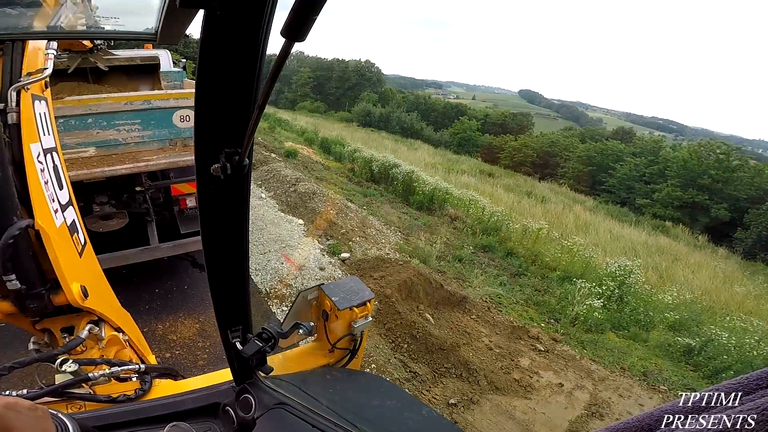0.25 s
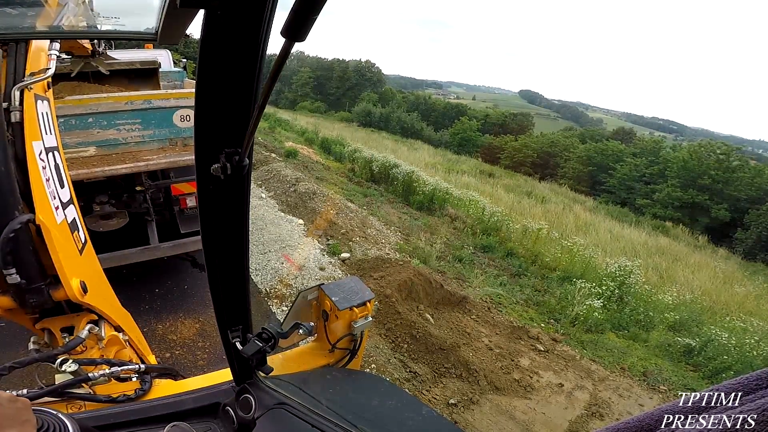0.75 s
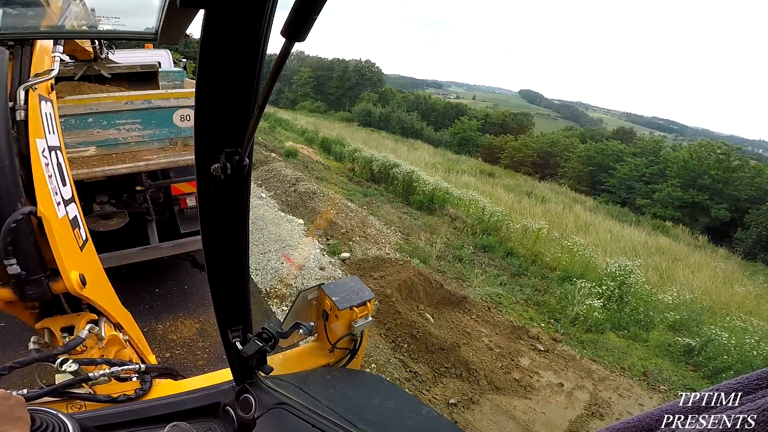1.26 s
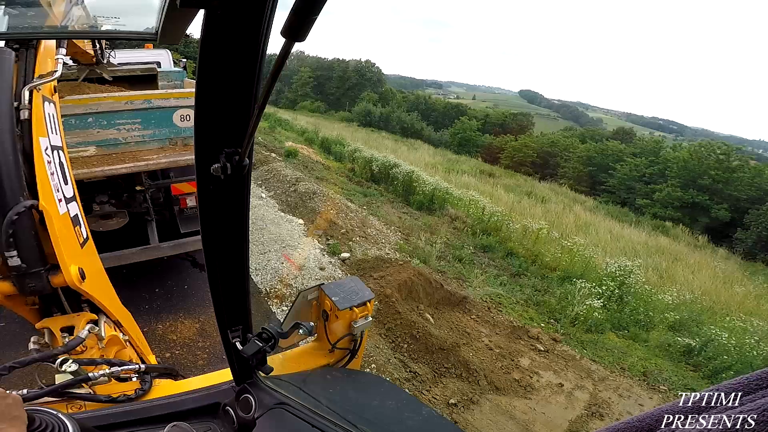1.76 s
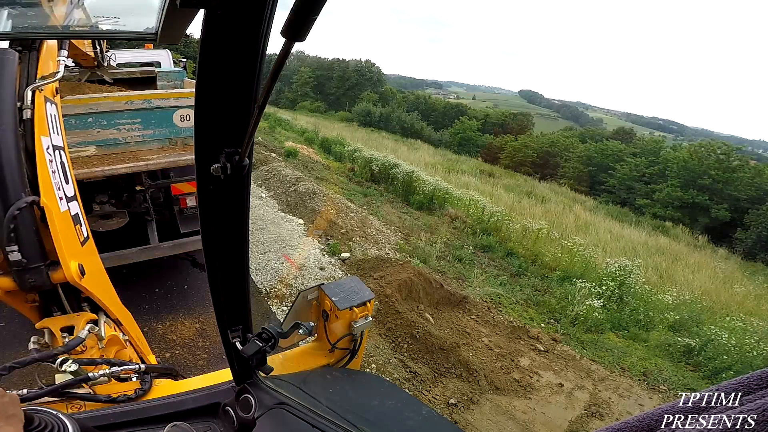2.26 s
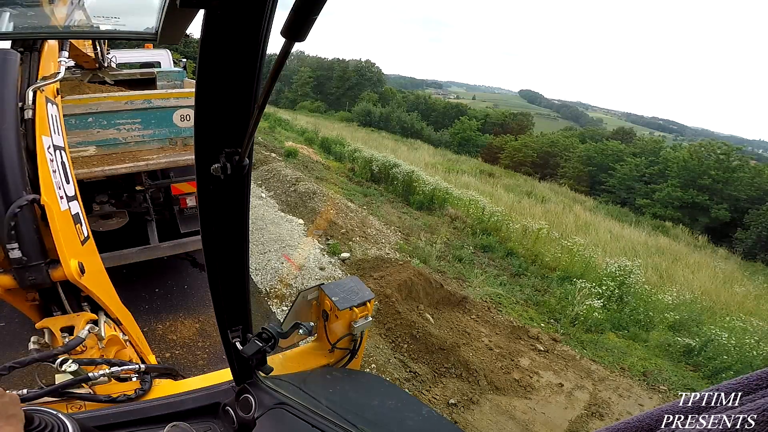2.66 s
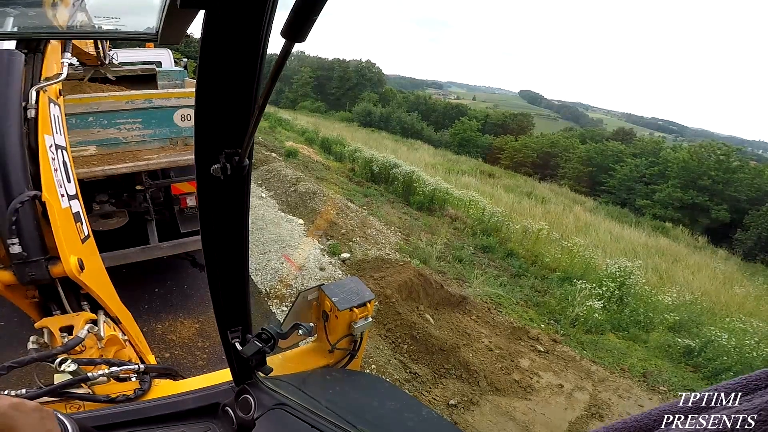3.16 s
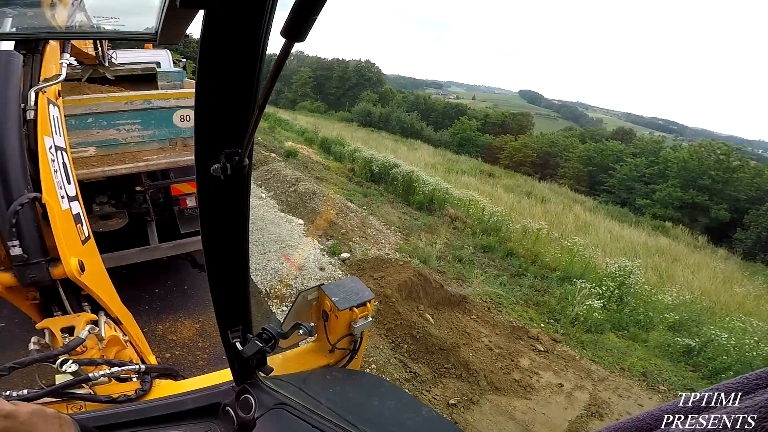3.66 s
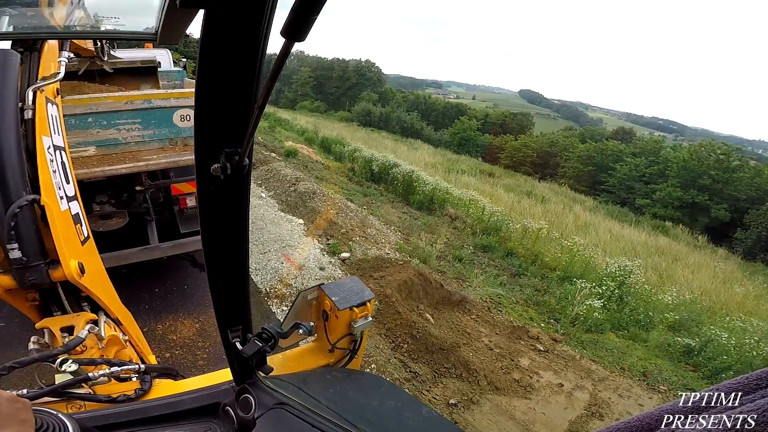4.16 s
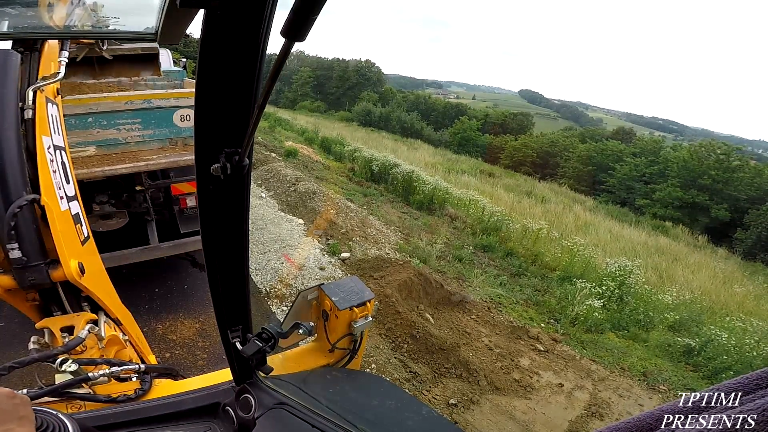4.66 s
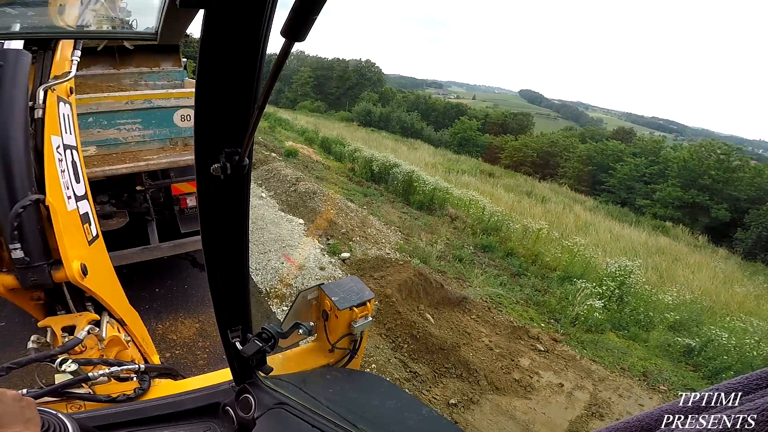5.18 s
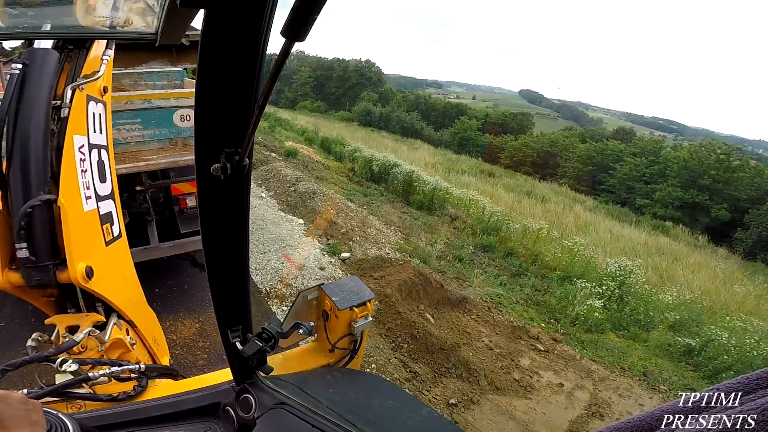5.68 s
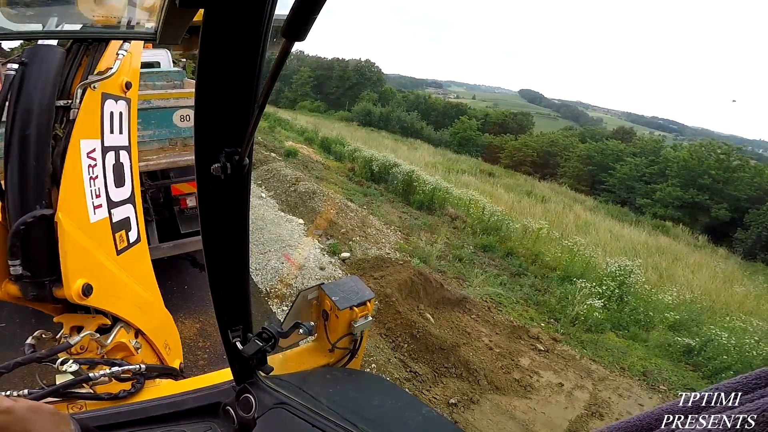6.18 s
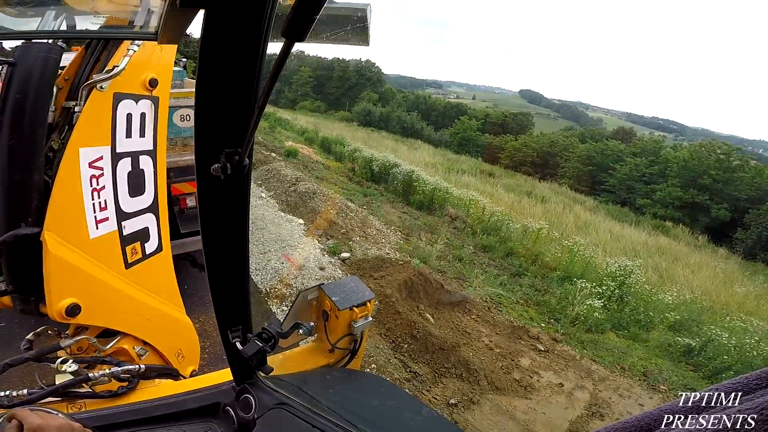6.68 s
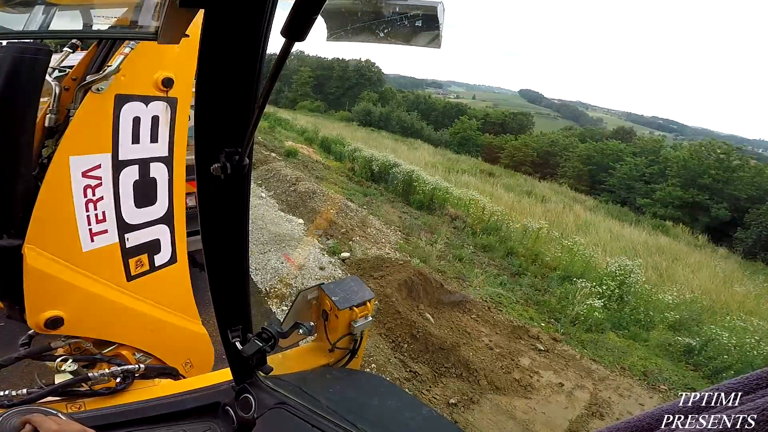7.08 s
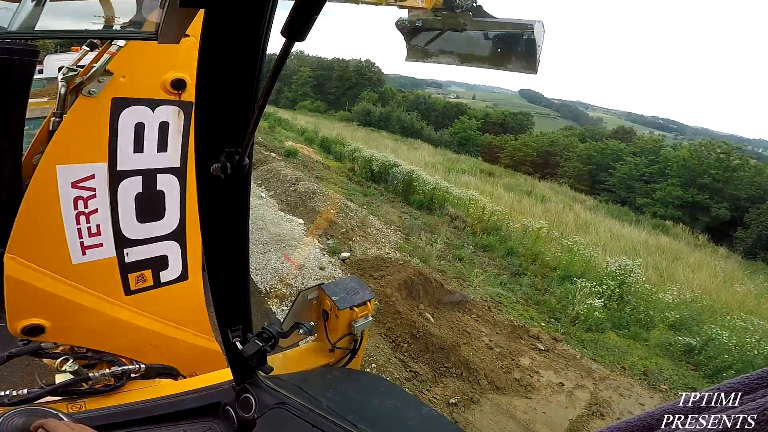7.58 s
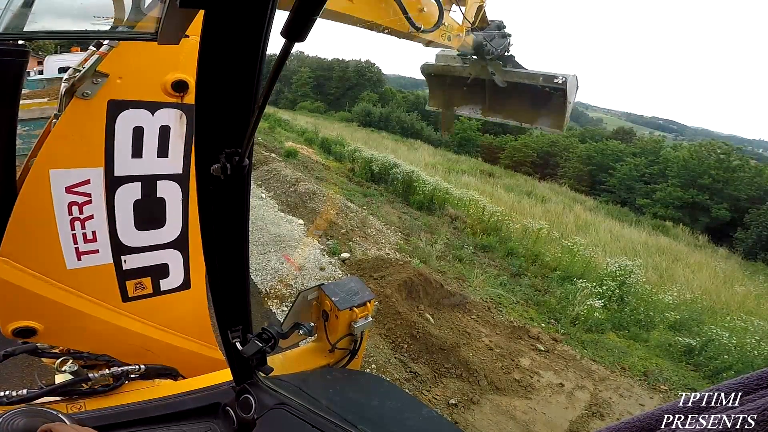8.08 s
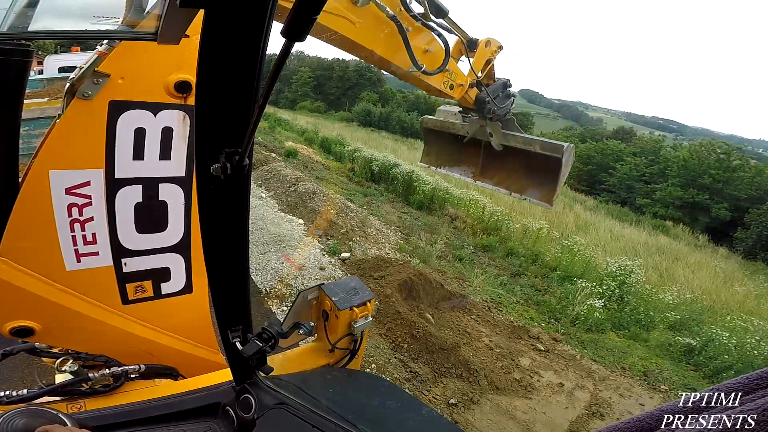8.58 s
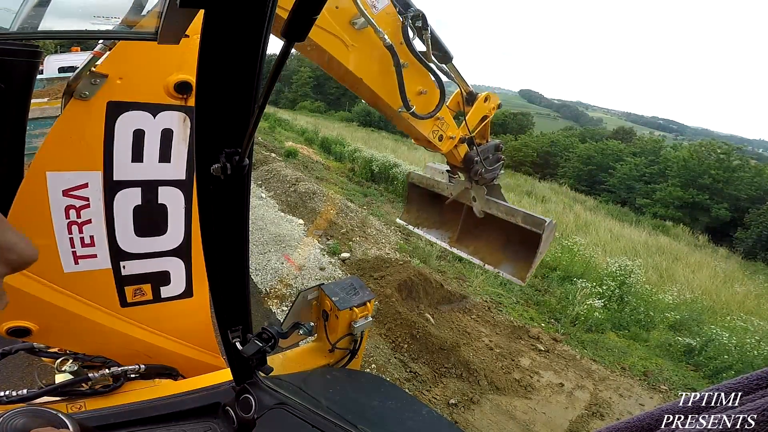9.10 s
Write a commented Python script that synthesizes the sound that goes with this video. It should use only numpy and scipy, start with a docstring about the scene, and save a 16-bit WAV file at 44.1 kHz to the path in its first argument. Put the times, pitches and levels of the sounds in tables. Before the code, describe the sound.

Droning diesel and valve hiss in a backhoe cab, a burst of close hollow knocks, a loud metallic clang, then gritty ticks and a squealing valve.

```python
"""A diesel throbs and oil hisses around the listener in the cab of a backhoe loader, as sines and noise. Close
knocks, struck modes and noise, dip the level; all but the valves' top fizz narrows to mono. A heavy clunk of
ringing steel modes then rocks the machine on its tyres while the engine sags. As the boom swings, gritty ticks
and a pump moan pass; gliding tones make the whistles and a squeal."""
import sys
import numpy as np
from scipy import signal
from scipy.fft import rfft, irfft, next_fast_len
from scipy.io import wavfile
from scipy.ndimage import uniform_filter1d, minimum_filter1d, map_coordinates

SR = 44100
rng = np.random.default_rng(int(sys.argv[2]) if len(sys.argv) > 2 else 0)


def master_out(mix):
    """Clip the mix to full scale and print it as 16-bit PCM to the path in sys.argv[1]."""
    frames = np.transpose(np.atleast_2d(mix))
    ceiling = np.clip(frames, -1, 1)
    pcm = np.round(ceiling * 32767).astype(np.int16)
    wavfile.write(sys.argv[1], SR, pcm)


N = 411894
TIME = np.arange(N) / SR
FFT_SIZE = next_fast_len(N, True)
BINS = np.fft.rfftfreq(FFT_SIZE, 1 / SR)


def gain_of(db):
    """Decibels to amplitude."""
    return 10 ** (np.asarray(db) / 20)


def evened(x):
    """Scales to an rms of one."""
    return x / np.sqrt(np.mean(x ** 2) + 1e-20)


def curve(rows, order=1):
    """One column of a table as a control over time."""
    columns = np.transpose(rows)
    return np.interp(TIME, columns[0], columns[order])


def colour(x, spectrum):
    """Filters by a spectrum that falls 60 dB per octave outside its ends."""
    hz, db = np.transpose(spectrum)
    octave, points = np.log2(BINS + 1), np.log2(hz + 1)
    outside = abs(octave - np.clip(octave, points[0], points[-1]))
    response = gain_of(np.interp(octave, points, db) - 60 * outside)
    return irfft(rfft(x, FFT_SIZE) * response, FFT_SIZE)[:N]


def noise(spectrum):
    """Noise of unit level with the given spectrum."""
    return evened(colour(rng.standard_normal(N), spectrum))


def wander(per_s):
    """A smooth random drift of unit size through so many random points a second."""
    knots = rng.standard_normal(4000)
    coarse = TIME[::64]
    drift = map_coordinates(knots, [coarse * per_s], mode="wrap")
    return np.interp(TIME, coarse, evened(drift))


def gritty(depth_db, per_s):
    """A fast uneven flutter of unit power that roughens a sound."""
    return evened(gain_of(depth_db * np.clip(wander(per_s), -2, 2)))


def placed(mid, pan, side=0):
    """Mid and side of a source; a negative pan leans to the right."""
    return np.array([mid, pan * mid + side])


# diffuse sound in the cab: pitch_hz, side_relative_to_mid_db
DIFFUSE = [(40, -20), (100, -4), (280, -13), (650, -1), (1300, 0.5), (3000, -6), (6700, 1), (15000, 1)]


def in_cab(spectrum, pan):
    """Noise with a direct part and a diffuse part thrown around by the windows."""
    return placed(noise(spectrum), pan, colour(noise(spectrum), DIFFUSE))


def shifted(before, after):
    """The colour of the sound changes during the knocks: an equal-power blend."""
    share = np.clip(curve([(3.0, 0.0017), (3.6, 1)]), 0, 1)
    return np.sqrt(1 - share) * before + np.sqrt(share) * after


def echoed(x, count=14):
    """Short reflections between the cab windows give a noise a boxy grain."""
    delays_s = rng.uniform(.004, .03, count)
    echoes = sum(rng.choice([-1, 1]) * np.roll(x, round(s * SR), axis=-1) for s in delays_s)
    return .95 * x + .3 * echoes / np.sqrt(count)


def blows(rows, rise_s):
    """Envelope of a row of blows, each rising quickly and dying away."""
    envelope = np.zeros(N)
    for s, db, t60 in rows:
        start = round(s * SR)
        age = TIME[:min(round(2 * t60 * SR), N - start)]
        envelope[start:][:len(age)] += gain_of(db - 60 * age / t60) * (1 - np.exp(-age / rise_s))
    return envelope


def ringing(hits, hz, t60, scatter_db=2.0, rise_s=0.00062, detune=.012):
    """One mode, set ringing afresh by each hit (s, dB), never quite the same way."""
    out, age = np.zeros(N), TIME[:round(1.5 * t60 * SR)]
    for s, db in hits:
        hit_db = db + scatter_db * rng.standard_normal()
        envelope = gain_of(hit_db - 60 * age / t60) * (1 - np.exp(-age / rise_s))
        hit_hz = hz * (1 + detune * rng.standard_normal())
        tone = np.sin(2 * np.pi * (hit_hz * age + rng.random()))
        out[round(s * SR):][:len(age)] += envelope * tone
    return out


def tones(orders, firings, waver, waver_per_s):
    """Sines locked to the crankshaft, each wavering in strength by itself."""
    out = 0
    for multiple, db in orders:
        strength = gain_of(db) * (1 + waver * wander(waver_per_s))
        out = out + strength * np.sqrt(2) * np.sin(2 * np.pi * (multiple * firings + rng.random()))
    return out


# valves that the driver opens: opens_s, closes_s, hiss_db, fizz_db (before its trim)
VALVES = [(.55, 2.3, -39.5, -59), (.78, 1.68, -40, -49), (1.45, 2.59, -46, -50.5), (1.6, 3.43, -44.5, -53),
          (4.1, 6.3, -54, -65), (5.5, 5.86, -38.5, -54), (6.14, 9.6, -41.5, -70), (6.74, 9.6, -42, -45.5),
          (7.35, 7.85, -38, -48.5), (9.05, 9.6, -38, -47.5)]
SPOOL_TRAVEL_S = 0.27  # time a valve takes to open or close
IDLE_HISS_DB, IDLE_FIZZ_DB = -42, -72  # oil circulating with all valves shut


def oil_flow(order):
    """One level column of the valves: each eases open, holds and eases shut, and their powers add."""
    power = 0
    for row in VALVES:
        inside_s = np.minimum(TIME - row[0], row[1] - TIME)
        opening = np.clip(inside_s / SPOOL_TRAVEL_S + .5, 0, 1)
        power = power + (gain_of(row[order]) * opening ** 2) ** 2
    return np.sqrt(power)


# spectrum of the fizz after the knocks: pitch_hz, level_db_per_hz
FIZZ_LATE = [(6500, -25), (8000, -3), (10000, -5), (11000, -16), (11600, -13), (12300, 1), (14000, 0),
             (15400, -2.5)]


def fizz(level_db=2.5, side_db=-2, pan=-0.36):
    """The highest hiss, a fine fizz that follows the valves; its top is given separate side noise."""
    early = in_cab([(7000, -12), (8200, -0.5), (10000, -1), (10800, -8), (13800, -10), (15000, -30)],
                   pan=-.15)
    top = [(12000, 0), (15400, -1)]
    mid = noise(FIZZ_LATE)
    side = pan * colour(mid, top) + gain_of(side_db - level_db) * noise(top)
    late = gain_of(level_db) * np.array([mid, side])
    return np.hypot(gain_of(IDLE_FIZZ_DB), oil_flow(order=3)) * shifted(early, late)


# thin steady singing of the oil lines before the knocks: pitch_hz, level_relative_to_hiss_db
SINGING = [(6056, -16), (6352, -21), (6708, -21), (7241, -23), (7348, -17.5), (7811, -21), (8457, -25),
           (8726, -28), (9780, -25)]


def line_singing(drift_per_s=18):
    """Oil lines sing as narrow bands: a cosine and a sine of each pitch drift independently."""
    out = 0
    for hz, db in SINGING:
        turn = 2 * np.pi * hz * TIME
        band = wander(drift_per_s) * np.cos(turn) + wander(drift_per_s) * np.sin(turn)
        out = out + gain_of(db) * band
    return placed(out, pan=-.3)


# valve hiss before and after the knocks: pitch_hz, level_db_per_hz
HISS_EARLY = [(2000, -8), (3000, -0.5), (3650, -6), (4400, -5.5), (4950, -6.5), (6000, -3), (7100, -2),
              (8500, -12), (10000, -19), (11500, -26), (13500, -40), (15200, -54)]
HISS_LATE = [(1760, -28), (3000, -26), (3480, -22), (4180, 2), (4970, 3), (6280, 0), (7460, -12),
             (9440, -14), (10500, -18), (11100, -21), (11400, -23), (11800, -24), (15300, -51),
             (22000, -120)]


def valve_hiss(flutter_db=0.8):
    """Oil hisses through the valves as noise with a slight flutter."""
    early = in_cab(HISS_EARLY, pan=-0.033) + line_singing()
    flow = shifted(early, in_cab(HISS_LATE, pan=0))
    level = np.hypot(gain_of(IDLE_HISS_DB), oil_flow(order=2)) * gain_of(flutter_db * wander(30))
    return level * echoed(flow)


# short spurts as valves open: start_s, level_db, length_s
SPURTS = [(2.492, -37, .04), (2.892, -35, 0.054), (2.984, -37, .035), (3.06, -35, 0.046),
          (3.576, -33.5, 0.086), (3.75, -34.5, 0.086)]
# spectrum of a spurt: pitch_hz, level_db_per_hz
SPURT = [(1000, -25), (1600, 7.5), (3200, -4.5), (4500, 5), (5800, 3.5), (7500, -12), (11000, -26),
         (15000, -42)]


def valve_spurts():
    """Oil spurts through an opening valve: a rounded puff of noise, strongest halfway."""
    envelope = sum(gain_of(db) * np.exp(-(2 * (TIME - s) / length - 1) ** 2)
                   for s, db, length in SPURTS)
    return placed(envelope * noise(SPURT), pan=0)


# valve whistles: start_s, length_s, first_pitch_hz, last_pitch_hz, width_hz, level_db
WHISTLES = [(.44, 0.38, 5820, 6020, 250, -42.5), (1.457, 0.37, 5700, 7300, 350, -41),
            (2.241, .16, 5850, 6560, 200, -34), (2.37, 0.11, 6550, 7700, 200, -49),
            (5.514, 0.13, 8700, 5630, 500, -48), (5.583, 0.18, 5400, 5290, 78, -35.5),
            (5.73, .09, 5600, 8800, 400, -50), (6.13, 0.22, 6400, 6050, 350, -44.5),
            (7.481, 0.41, 6370, 5860, 230, -40)]


def whistles(side_share=.6, pure_width_hz=60, fade_share=0.56):
    """A jet at a valve edge glides as the spool moves; a narrow jet locks into a purer tone."""
    out = np.zeros((2, N))
    for s, length, first_hz, last_hz, width_hz, db in WHISTLES:
        hz = np.linspace(first_hz, last_hz, round(length * SR))
        # noise narrowed by a double pole makes the tone breathy
        r = np.exp(-2 * np.pi * width_hz / SR)
        fuzz = rng.standard_normal((2, SR)) + 1j * rng.standard_normal((2, SR))
        fuzz = signal.lfilter([1], [1, -2 * r, r * r], fuzz)[:, -len(hz):]
        strength = fuzz / np.std(fuzz) + pure_width_hz / width_hz
        song = evened((strength * np.exp(2j * np.pi * np.cumsum(hz) / SR)).real)
        fade = signal.windows.tukey(len(hz), fade_share)
        out[:, round(s * SR):][:, :len(hz)] += song * gain_of(db) * fade
    return out * [[1], [side_share]]


# a valve squeals, falling in pitch as its spool travels: time_s, pitch_hz, level_db
SQUEAL = [(7.46, 2060, -52), (7.495, 1950, -33), (7.53, 1810, -39), (7.55, 1750, -33), (7.64, 1570, -43),
          (7.69, 1465, -31), (7.745, 1340, -47), (7.775, 1280, -47), (7.795, 1245, -28.5),
          (7.83, 1195, -31), (7.86, 1165, -39), (7.97, 1140, -34.5), (8.06, 1122, -30), (8.14, 1110, -48)]
# the cab lets little of the squeal's treble in: pitch_hz, gain_db
SQUEAL_COLOUR = [(900, 0), (2400, 0), (2800, -14), (4200, -20)]


def squeal(overtone_db=-12, jitter=.007, jitter_per_s=120, flutter_db=2.6, flutter_per_s=55):
    """A thin, unsteady valve tone that keeps breaking up, with a faint octave."""
    hz = curve(SQUEAL) * (1 + jitter * wander(jitter_per_s))
    turn = 2 * np.pi * np.cumsum(hz) / SR
    sounding = (TIME > SQUEAL[0][0]) * (TIME < SQUEAL[-1][0])
    level = gain_of(curve(SQUEAL, order=2)) * sounding * gritty(flutter_db, flutter_per_s)
    tone = np.sqrt(2) * (np.sin(turn) + gain_of(overtone_db) * np.sin(2 * turn))
    return placed(colour(level * tone, SQUEAL_COLOUR), pan=0)


# the pump moans while the boom swings: start_s, length_s, level_db
MOAN = (6.15, 1.15, -35)
MOAN_ORDER = 10.93  # multiple of the firing rate


def pump(speed, waver=0.22):
    """The pump's tone, tied to engine speed, swells and fades as it drives the swing."""
    s, length, db = MOAN
    swell = np.sin(np.pi * np.clip((TIME - s) / length, 0, 1))
    moan = tones([(MOAN_ORDER, db)], np.cumsum(speed) / SR, waver, waver_per_s=10)
    return placed(swell * moan, pan=0)


# dry ticks, two a second, as the boom swings: peak_s, level_db
TICKS = [(6.385, -29), (6.881, -25.5), (7.377, -27.5)]
# spectrum of a tick: pitch_hz, level_db_per_hz
TICK = [(1000, -16), (1550, 3), (2300, -5), (3300, -8), (4500, 5), (5800, 4), (7300, -11), (11000, -29),
        (15000, -42)]
TICK_RISE_S, TICK_FALL_S = .011, .017


def ticks(grit_db=3, grit_per_s=400):
    """Each tick is a tight, gritty cluster that comes to a sharp point."""
    envelope = 0
    for s, db in TICKS:
        distance = np.maximum((s - TIME) / TICK_RISE_S, (TIME - s) / TICK_FALL_S)
        envelope = envelope + gain_of(db) * np.exp(-distance)
    return placed(envelope * gritty(grit_db, grit_per_s) * noise(TICK), pan=0)


# knocks close to the microphone: start_s, hollow_ring_db, dull_contact_db, thump_db (before its trim)
KNOCKS = [(3.004, -24, -12.5, -9), (3.014, -20, -22, -28), (3.038, -22, -26, -24), (3.06, -21, -26, -28),
          (3.082, -21, -25, -30), (3.095, -26, -29, -10), (3.108, -18, -22, -28), (3.157, -33, -33, -25),
          (3.175, -37, -33, -32), (3.204, -15.5, -21, -12), (3.226, -23, -27, -11), (3.243, -25, -29, -26),
          (3.258, -26, -29, -24), (3.349, -24, -31, -11.5), (3.368, -22, -30, -24), (3.392, -32, -38, -26),
          (3.416, -26, -32, -22), (3.426, -29, -32, -29), (3.449, -32, -38, -30), (3.505, -36, -37, -18),
          (3.53, -29.5, -31.5, -27), (3.613, -37, -42, -24)]
# hollow ring of a knock: pitch_hz, mid_db, side_db, t60_s
HOLLOW = [(346, -11, -17, 0.1), (430, -6.5, -12, 0.15), (490, -9, -10, .08), (588, -5, 2.5, .13),
          (655, -8.5, 3, 0.11), (735, -13.5, -1, 0.11), (905, -16, 0.5, 0.08), (977, -14, 1.5, 0.08),
          (1146, -23, -2, 0.08), (1270, -25, -9, .07), (1379, -17, -13, 0.09), (1790, -27, -22, 0.07),
          (1990, -29, -28, 0.06)]
# dull body of a knock: pitch_hz, level_db_per_hz
KNOCK_BODY = [(200, -1), (380, 5), (720, -5), (1000, -7), (1300, -14), (2000, -20), (3000, -23),
              (6000, -31)]
KNOCK_T60_S = .055  # the dull contact noise
# the low thump under each knock sinks in pitch through the series
THUMP_HZ, THUMP_SAG_HZ_PER_S, THUMP_RISE_S, THUMP_T60_S = 104, 36, 0.0087, .24


def knocks(thump_db=1, waver=0.3, waver_per_s=30, overtone=1.42, overtone_db=-8,
           grit_db=2.2, grit_per_s=260):
    """Bumps and scrapes near the microphone: dull contact, rough hollow modes and a low thump."""
    hits = [row[:2] for row in KNOCKS]
    contact_hits = [(s, db, KNOCK_T60_S) for s, _, db, _ in KNOCKS]
    contact = blows(contact_hits, rise_s=0.0015) * noise(KNOCK_BODY)
    ring = 0
    for hz, mid_db, side_db, t60 in HOLLOW:
        mode = ringing(hits, hz, t60, scatter_db=2.5, rise_s=0.003, detune=.022)
        # a side stronger than the mid opposes the two ears
        ring = ring + np.outer([gain_of(mid_db), -gain_of(side_db)], mode)
    push = blows([(s, db + thump_db, THUMP_T60_S) for s, *_, db in KNOCKS], THUMP_RISE_S)
    hz = THUMP_HZ - THUMP_SAG_HZ_PER_S * (TIME - KNOCKS[0][0])
    turn = 2 * np.pi * np.cumsum(hz) / SR + waver * wander(waver_per_s)
    thump = push * np.sqrt(2) * (np.sin(turn) + gain_of(overtone_db) * np.sin(overtone * turn))
    return ring * gritty(grit_db, grit_per_s) + placed(contact + thump, pan=-0.51)


# jolts that rock the machine on its tyres: start_s, sway_db, shudder_db, t60_s
JOLTS = [(3.3, -24, -21, 2.9), (5.72, -4, -14, 1.1), (6.2, -27, -13, 4), (7.62, -24, -18, 1.5)]
SWAY_HZ, JOLT_RISE_S = 14, 0.12


def rocking():
    """After each jolt the machine sways on its tyres, a low sine, and shudders, a low noise."""
    sway = blows([(s, db, t60) for s, db, _, t60 in JOLTS], JOLT_RISE_S)
    sway = sway * np.sin(2 * np.pi * SWAY_HZ * TIME)
    shudder = blows([(s, db, t60) for s, _, db, t60 in JOLTS], JOLT_RISE_S)
    shudder = shudder * noise([(15, -9), (30, -1), (48, 1), (70, -8), (110, -17)])
    return placed(sway + shudder, pan=0)


# blows of steel on steel in the boom: start_s, crash_db, crash_t60_s, ring_db, pin_clack_db,
# panel_db, thud_db, snap_db
CLUNKS = [(5.712, -12, .12, -19, -34, -25, -9, -27), (5.722, -20, .09, -20, -34, -27, -20, -40),
          (5.739, -22, 0.1, -25, -34, -22, -11, -42), (5.756, -32, .08, -30, -36, -21, -17, -50),
          (5.792, -26, .07, -28, -19, -25, -27, -36), (5.839, -40, .06, -40, -32, -24, -24, -55),
          (5.864, -36, .08, -39, -17.5, -25, -13, -45), (5.897, -41, .06, -36, -26, -31, -32, -55),
          (5.931, -38, .04, -44, -16.5, -31, -36, -55), (6.057, -23.5, 0.05, -36, -16, -26, -12, -32)]
# spectrum of the crash: pitch_hz, level_db_per_hz
CRASH = [(150, -39), (250, -21), (422, -6), (518, -14), (689, -9), (807, -9), (1160, -3.5), (1320, -10),
         (1540, -7.5), (2410, -17.5), (3200, -21.5), (5930, -21), (11000, -65), (14300, -85), (22000, -120)]
# scrape of the chattering parts: pitch_hz, level_db_per_hz
CHATTER = [(300, -4), (420, 0), (760, -2), (900, -13), (1700, -17), (3000, -30)]
# loose parts chatter on against the panels: start_s, length_s, first_hit_db, fall_db
RATTLE = (5.745, .17, -27.5, 7)
# modes of the boom, the loose pin, the body panels and the frame: pitch_hz, level_db, t60_s
STEEL = [(690, -10, 0.14), (868, -7, 0.18), (990, -4, 0.16), (1085, -7, 0.2), (1165, -4, .15),
         (1400, -9, .1), (1540, -8, .13), (1590, -8, 0.11), (1700, -11, .2), (1850, -10, .15),
         (2366, -15, .15)]
PIN = [(480, -8, .04), (640, -7, .04), (745, -1.5, .06), (1370, -14, .04), (1890, -24, 0.05)]
PANELS = [(350, -8, .1), (415, -1, .22), (495, -13, .09), (576, -3, .27), (650, -13, .09), (732, -3.5, .27)]
THUD = [(121, 2, 0.215), (240, -6, 0.15)]


def clunks(count=16, scrape_db=-6, scrape_t60_s=.05, snap_t60_s=.015):
    """Steel strikes steel: snap and crash, then boom, pin, frame and panels ring as struck modes."""
    times, _, _, ring_db, pin_db, panel_db, thud_db, snap_db = np.transpose(CLUNKS)
    start, length, first_db, fall_db = RATTLE
    progress = (np.arange(count) + rng.random(count)) / count
    rattle = [(start + length * u, first_db - fall_db * u) for u in progress]
    crash = blows([row[:3] for row in CLUNKS], rise_s=.0018) * noise(CRASH)
    snap = blows([(s, db, snap_t60_s) for s, db in zip(times, snap_db)], rise_s=.0003)
    snap = snap * noise([(2000, 0), (9000, -4), (14000, -16)])
    scrape = blows([(s, db + scrape_db, scrape_t60_s) for s, db in rattle], rise_s=.001)
    out = crash + snap + scrape * noise(CHATTER)
    struck = [(STEEL, [*zip(times, ring_db)]), (PIN, [*zip(times, pin_db)]),
              (PANELS, [*zip(times, panel_db), *rattle]), (THUD, [*zip(times, thud_db)])]
    for modes, hits in struck:
        for hz, db, t60 in modes:
            mode_hits = [(s, hit_db + db) for s, hit_db in hits]
            out = out + ringing(mode_hits, hz, t60, detune=.009)
    return placed(out, pan=0)


BUILD_UP_S = 0.13  # the shaking follows the engine speed this much later


def shaken(speed, part):
    """Strength of one cab part, swelling as the engine nears the speed that it resonates with."""
    felt = np.interp(TIME - BUILD_UP_S, TIME, speed)
    strengths = [gain_of(db + swell_db * np.exp(-((felt - centre) / reach) ** 2))
                 for db, swell_db, centre, reach in part]
    return shifted(*strengths)


# how the cab walls pass the engine tones, so each swells and fades with speed: pitch_hz, gain_db
WALLS = [(15, -2), (80, 0), (100, -4), (111, -7), (119, 1.5), (127, -3.5), (180, 2), (198, 1.5), (208, -2),
         (218, -4), (229, -2), (245, 0), (270, 1), (283, -4), (300, -7), (322, -2), (360, -2), (800, -1)]


def through_walls(orders, firings, waver):
    """Engine tones coloured by the cab walls."""
    return colour(tones(orders, firings, waver, waver_per_s=5), WALLS)


# low engine tones: multiple_of_firing_rate, level_relative_to_rumble_db (before the rumble's trim)
LOW_ORDERS = [(.5, -20), (.75, -14), (2, -5), (2.25, -15.5), (2.5, -17), (3, -6.5), (3.25, -14)]
# frame rumble before and after the knocks: pitch_hz, level_db_per_hz
RUMBLE_EARLY = [(8, -24), (16, -10), (30, -7), (55, -10), (72, -0.5), (84, -4.5), (95, 5), (106, -3),
                (150, -6.5), (200, -30)]
RUMBLE_LATE = [(8, -20), (16, -7), (30, -5), (52, 0), (72, -1), (92, -5.5), (120, -1.5), (150, -2),
               (200, -19)]
# shaking of the frame, a row before the knocks and a row after:
# level_db, swell_db, centre_firings_per_s, reach_firings_per_s
FRAME_SHAKE = [(-19, 7, 37.93, 1.3), (-19.5, 5, 37.4, 1.36)]


def frame_rumble(speed, firings, rumble_db=-4.4):
    """The engine shakes the frame: low crankshaft tones over a rumbling noise."""
    low = placed(through_walls(LOW_ORDERS, firings, waver=.15), pan=-.33)
    frame = shifted(in_cab(RUMBLE_EARLY, pan=-0.4), in_cab(RUMBLE_LATE, pan=-0.74))
    return shaken(speed, FRAME_SHAKE) * (low + gain_of(rumble_db) * frame)


# tones that excite the cab air: multiple_of_firing_rate, level_relative_to_boom_db (before the boom's trim)
BOOM_ORDERS = [(3.75, -19.5), (4, -7.5), (4.25, -7.5), (4.5, -12), (4.75, -10.5)]
# boom of the cab air: pitch_hz, level_db_per_hz
BOOM = [(130, -14), (155, -8.5), (172, 3), (190, -2), (225, -26)]
# shaking of the cab air, a row before the knocks and a row after: # level_db, swell_db, centre_firings_per_s,
# reach_firings_per_s (the boom and drone column of ENGINE_LEVELS shifts the level)
AIR_SHAKE = [(-24.3, 5.4, 40.6, 2.1), (-26, 12.6, 41.26, 2.48)]


def cab_boom(speed, firings, boom_db=-4.0):
    """The air in the cab booms: engine tones over a low noise."""
    air_tones = placed(tones(BOOM_ORDERS, firings, waver=0.25, waver_per_s=5), pan=-0.17)
    return shaken(speed, AIR_SHAKE) * (air_tones + gain_of(boom_db) * in_cab(BOOM, pan=-.15))


# engine and pump tones: multiple_of_firing_rate, level_relative_to_drone_db (before the drone's trim)
ORDERS = [(5, -13), (5.25, -11.5), (5.75, -6.8), (6.25, -7), (6.75, -4.5), (7, -15.5), (7.25, -13),
          (7.5, -15), (8, -22), (8.25, -20), (8.5, -28), (9, -16), (12, -29.5), (12.5, -27.5), (13.5, -26),
          (14.5, -26), (14.75, -25), (15.25, -28), (18, -26.5)]
# panel drone before and after the knocks: pitch_hz, level_db_per_hz
DRONE_EARLY = [(170, -28), (210, -6.5), (255, 0.5), (285, -5.5), (320, -13.5), (358, -10.5), (390, -21.5),
               (520, -39)]
DRONE_LATE = [(170, -25), (210, -10.5), (255, -1), (290, -4.5), (325, -7), (365, -9.5), (410, -15.5),
              (520, -34.5)]
# shaking of the panels, a row before the knocks and a row after: # level_db, swell_db, centre_firings_per_s,
# reach_firings_per_s (the boom and drone column of ENGINE_LEVELS shifts the level)
PANEL_SHAKE = [(-24.3, 2.3, 40.1, 1.3), (-25, 6.46, 38.94, 4.2)]


def panel_drone(speed, firings, drone_db=-6):
    """Engine and pump tones and a droning noise from the cab panels."""
    panel_tones = placed(through_walls(ORDERS, firings, waver=.1), pan=-.2)
    panels = shifted(in_cab(DRONE_EARLY, pan=-0.24), in_cab(DRONE_LATE, pan=-.2))
    return shaken(speed, PANEL_SHAKE) * (panel_tones + gain_of(drone_db) * panels)


# combustion clatter before and after the knocks: pitch_hz, level_db_per_hz
CLATTER_EARLY = [(220, -26), (380, -3), (446, -8), (494, -0.5), (540, -9), (580, -2), (622, -5.5),
                 (661, -3.5), (911, -10), (1100, -8), (1400, -11), (1730, -10.5), (2120, -14), (3650, -25),
                 (4200, -21.5), (5460, -31), (9240, -120)]
CLATTER_LATE = [(220, -28), (380, -4), (446, -9), (494, -2), (540, -10), (585, -3), (665, -3.5),
                (780, -5.5), (911, -9), (1120, -6.3), (1400, -11), (1730, -10.7), (2120, -13.7),
                (3650, -24.5), (4200, -21.5), (5460, -33), (9240, -120)]


def combustion_clatter(firings, knock_depth=0.28, uneven_db=0.55):
    """Each firing lifts a bed of noise in a short burst of drifting strength."""
    bursts = evened(1 + knock_depth * np.exp(-(firings % 1) / 0.33))
    clatter = shifted(in_cab(CLATTER_EARLY, pan=-0.18), in_cab(CLATTER_LATE, pan=0))
    return bursts * gain_of(uneven_db * wander(25)) * echoed(clatter)


# levels of the engine sounds over time: time_s, firing_note_db, clatter_db (before its trim),
# cab_boom_and_drone_db; boom and drone duck briefly after the clunk
ENGINE_LEVELS = [(0, -19, -36.5, -0.5), (.8, -15, -33.5, -0.5), (2.3, -16, -32, -1), (3.0, -20, -33, -0.5),
                 (3.55, -16, -38.5, -4.5), (3.85, -13, -37, 1.5), (4.4, -18, -34, -1), (4.9, -18, -34, -0.5),
                 (5.7, -15.5, -32.5, 0), (5.8, -17.5, -31.5, -5), (6.0, -17.5, -39.5, -4), (6.4, -13.5, -38, 0.5),
                 (6.9, -14, -32, 1.5), (7.5, -19, -32.5, 1.5), (7.8, -12.5, -31.5, -3), (8.2, -16.5, -33, 1.5),
                 (9.34, -17.5, -33.5, -1)]


def engine(speed, clatter_db=3.0):
    """The diesel's firing note, its clatter and the frame, air and panels it shakes."""
    firings = np.cumsum(speed) / SR
    firing_note = placed(tones([(1, 0)], firings, waver=0.1, waver_per_s=12), pan=-0.14)
    throb = gain_of(curve(ENGINE_LEVELS)) * firing_note
    clatter = gain_of(curve(ENGINE_LEVELS, order=2) + clatter_db) * combustion_clatter(firings)
    cab = cab_boom(speed, firings) + panel_drone(speed, firings)
    return throb + clatter + frame_rumble(speed, firings) + gain_of(curve(ENGINE_LEVELS, order=3)) * cab


# engine speed: time_s, firings_per_s
SPEED = [(0.0, 41.67), (1.0, 40.65), (2.5, 39.35), (3.3, 38.11), (3.75, 36.04), (4.1, 36.85), (4.8, 40.34),
         (5.2, 40.06), (5.7, 40.12), (5.95, 35.56), (6.2, 35.51), (7.0, 37.01), (7.5, 38.05), (7.75, 41.16),
         (8.0, 42.21), (9.34, 40.2)]
# the level drops abruptly and creeps back: time_s, gain_db
DIP = [(3.009, 0), (3.019, -16), (3.034, -15), (3.05, -9.5), (3.2, -9.5), (3.4, -13.5), (3.7, -11.5),
       (4.8, -1)]
# stereo image of all but the fizz: time_s, width_factor
WIDTH = [(0, 1), (3.5, 1), (3.65, 0.33), (4, 0.038), (4.4, 0)]


def scene():
    """All sources as mid and side, turned into left and right."""
    speed = curve(SPEED)
    dip = gain_of(curve(DIP))
    oil = valve_hiss() + valve_spurts() + whistles() + squeal()
    dipped = dip * (oil + pump(speed) + engine(speed))
    # ticks, impacts and rocking keep their level through the dip
    mid, side = dipped + ticks() + knocks() + rocking() + clunks()
    fizz_mid, fizz_side = dip * fizz()
    mid, side = mid + fizz_mid, side * curve(WIDTH) + fizz_side
    return np.array([mid + side, mid - side])


EDGE_HZ = 15400  # upper edge of the sound


def record(dry):
    """A quick limiter holds the peaks just under full scale; then the band limit."""
    room = np.minimum(1, .92 / (abs(dry).max(axis=0) + 1e-9))
    gain = uniform_filter1d(minimum_filter1d(room, size=300), size=300)
    low_pass = signal.firwin(511, EDGE_HZ, window=("kaiser", 9), fs=SR)
    return signal.oaconvolve(dry * gain, low_pass[None], "same")


dry = scene()
out = record(dry)
master_out(out)
```